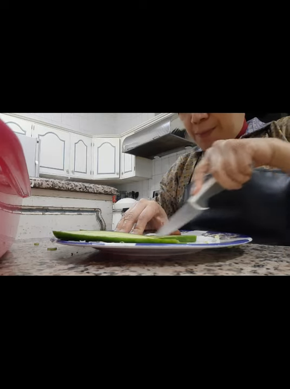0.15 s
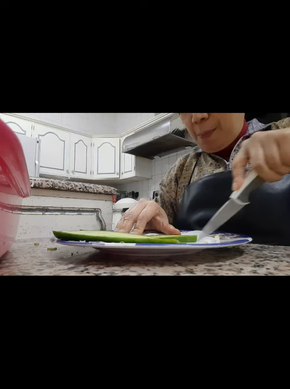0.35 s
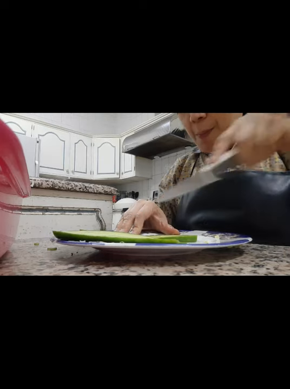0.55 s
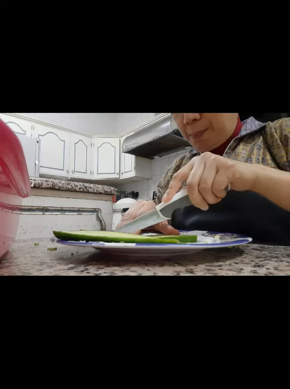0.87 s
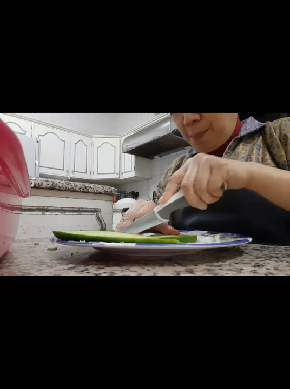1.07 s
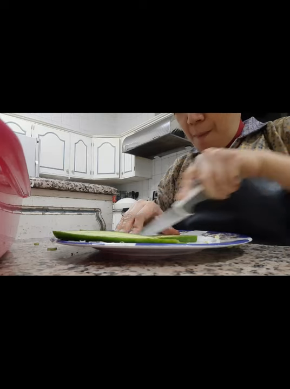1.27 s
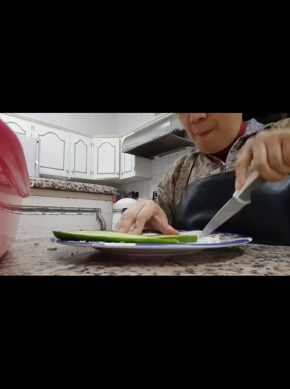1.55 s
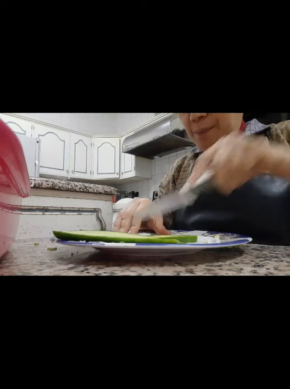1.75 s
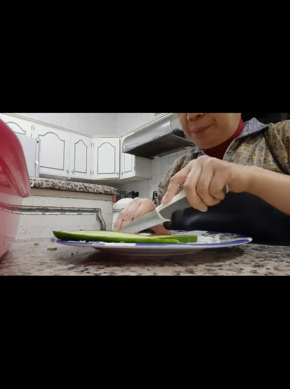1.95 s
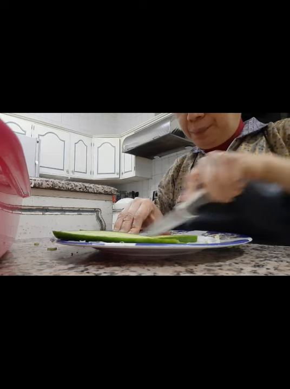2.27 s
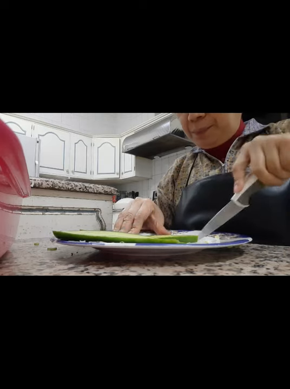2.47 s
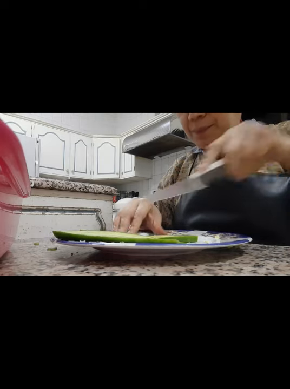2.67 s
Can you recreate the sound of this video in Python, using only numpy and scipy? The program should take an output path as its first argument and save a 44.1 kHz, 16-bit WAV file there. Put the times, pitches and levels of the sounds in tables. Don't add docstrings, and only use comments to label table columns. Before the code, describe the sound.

A knife slices a cucumber on a china plate, crunchy rasps ending in sharp clicks

```python
import sys
import numpy as np
from scipy import signal
from scipy.fft import rfft, irfft
from scipy.io import wavfile
from scipy.ndimage import uniform_filter1d

SR = 44100
rng = np.random.default_rng(int(sys.argv[2]) if len(sys.argv) > 2 else 0)


def file_out(sig):
    cols = np.atleast_2d(sig).T
    lim = np.clip(cols, -1, 1)
    pcm = np.round(lim * 32767).astype(np.int16)
    wavfile.write(sys.argv[1], SR, pcm)


def decibels_to_gain(level_db):
    exponent = np.asarray(level_db, float) / 20
    return 10 ** exponent


N = 123479


def table(rows, hz):
    r = np.array(rows)
    return np.interp(np.log(hz), np.log(r[:, 0]), r[:, 1])


def unit(x):
    return x / np.sqrt(np.mean(x ** 2))


def ring(x, modes):
    out = 0
    for k, (hz, db, t60_s) in enumerate(modes):
        pole = np.exp(2j * np.pi * hz / SR - np.log(1000) / (t60_s * SR))
        out = out + (-1) ** k * decibels_to_gain(db) * signal.lfilter([1], [1, -pole], x).imag
    return out


def walk(rate_hz):
    hold = int(SR / rate_hz)
    levels = np.repeat(rng.standard_normal(N // hold + 1), hold)
    return uniform_filter1d(levels, hold)[:N]


# [f/Hz, width/Hz, level/dB]
FRIDGE_BANDS = [(56, 22, -68.5), (238, 14, -53), (292, 14, -47), (317, 12, -48), (365, 20, -55),
                (410, 14, -56), (463, 8, -53), (2720, 140, -70)]
# [f/Hz, density/dB]
AIR_SPECTRUM = [(40, -32.5), (280, -10), (460, -12.5), (1320, -32.5), (2750, -46.5), (3100, -56),
                (9000, -56.5), (15000, -68)]
# [f/Hz, level/dB]
AIR_SIDE = [(30, 0), (130, -16), (300, -10), (2000, 6), (10000, -1.5)]
MOTOR_DB = [-62.5, -48.5, -47.5]
AIR_DB = -42.5
MOTOR_HZ, FAN_HZ, FAN_DB, MOTOR_WAVER_DB = 105.6, 291.8, -45.5, 2.5


def kitchen():
    hz = np.maximum(np.fft.rfftfreq(N, 1 / SR), 1)
    power = decibels_to_gain(table(AIR_SPECTRUM, hz)) ** 2
    power = power / power.sum() * decibels_to_gain(AIR_DB) ** 2
    for f_hz, width_hz, db in FRIDGE_BANDS:
        band = 1 / (1 + (2 * (hz - f_hz) / width_hz) ** 4)
        power = power + band / band.sum() * decibels_to_gain(db) ** 2
    side_gain = decibels_to_gain(table(AIR_SIDE, hz))
    shape = np.sqrt(power * len(hz)) * [np.ones(len(hz)), side_gain]
    mid, side = irfft(rfft(rng.standard_normal((2, N))) * shape, N)

    phase = 2 * np.pi * MOTOR_HZ * np.cumsum(1 + .004 * walk(3)) / SR
    for k, db in enumerate(MOTOR_DB):
        level = np.sqrt(2) * decibels_to_gain(db + MOTOR_WAVER_DB * walk(9))
        mid = mid + level * np.sin((k + 1) * phase)
    fan_level = np.sqrt(2) * decibels_to_gain(FAN_DB + MOTOR_WAVER_DB * walk(12))
    mid = mid + fan_level * np.sin(phase * FAN_HZ / MOTOR_HZ)
    return np.array([mid + side, mid - side]) * decibels_to_gain(0.26 * walk(1.26))


# [f/Hz, t60/s]
ROOM_T60 = [(300, 0.94), (2000, 0.81), (5000, 0.56), (14000, 0.31)]
PREDELAY_S = 0.0054


def echo(size=40000):
    t, out = np.arange(size) / SR, 0
    for hz in 250 * np.sqrt(2) ** np.arange(13):
        edges_hz = [hz / np.sqrt(2), min(hz * np.sqrt(2), .45 * SR)]
        sos = signal.butter(2, edges_hz, "band", fs=SR, output="sos")
        noise = signal.sosfilt(sos, rng.standard_normal((2, size)))
        out = out + noise * decibels_to_gain(-60 * t / table(ROOM_T60, hz))
    out = out * np.clip(t / PREDELAY_S, 0, 1)
    return out / np.sqrt(np.sum(out ** 2, axis=1, keepdims=True))


APART = [0.89, 0.12, 0.67, 0.97]


def ports(shared, left, right, group):
    apart = APART[group]
    return np.sqrt(1 - apart) * shared + np.sqrt(apart) * np.array([left, right])


KNOCK_SAMPLES, PORT_LAG_S = 8192, 4.6e-5


def knocks(rows, groups, contact_s, chatter_db):
    out, t = np.zeros((3, N + KNOCK_SAMPLES)), np.arange(KNOCK_SAMPLES) / SR
    lag = np.array([[0], [int(PORT_LAG_S * SR)]])
    for row in rows:
        i = int(row[0] * SR)
        for g, modes in enumerate(groups):
            strike_at = int(contact_s[g] * SR / 8) + lag
            strike = 1. * (np.arange(KNOCK_SAMPLES) == strike_at)
            rough = ports(*rng.standard_normal((3, KNOCK_SAMPLES)), g)
            chatter = decibels_to_gain(chatter_db) * rough * np.exp(-(t / contact_s[g]) ** 2)
            y, even = ring(strike + chatter, modes), ring(strike[0], modes)
            if g in (1, 2):
                y, even = ring(y, modes), ring(even, modes)
            even = unit(even) * np.sqrt(np.mean(y ** 2))
            gain = decibels_to_gain(row[1 + g]) / np.abs(y).max()
            out[:, i:i + KNOCK_SAMPLES] += np.vstack([y, even]) * gain
    return out[:, :N]


# [t/s, crack/dB, boom/dB, body/dB, ring/dB], peaks
LANDINGS = [
    (1.0615, -42, -55, -45, -66),
    (1.1065, -26, -27, -29.5, -32.5),
    (2.1242, -15.5, -26, -23, -21),
    (2.4484, -37, -50, -20, -60),
    (2.6267, -49, -26.5, -43, -44),
    (2.79, -61, -64, -58, -56),
]
# [f/Hz, level/dB, t60/s]
LANDING_MODES = [
    [(2800, -4, .004), (3900, -3, 0.003), (5600, -2, 0.002), (7300, -2, 0.0015), (9200, -1, 0.0015), (11500, -2, .0012), (14200, -3, .0012)],
    [(700, 0, 0.009), (900, -4, 0.008)],
    [(1800, 1.5, 0.007), (2130, -1, .007)],
    [(635, -2, 0.13), (2400, 0, 0.16)],
]
LANDING_CONTACT_S = [0.0051, 0.00067, 0.003, 0.0023]


def landings():
    return knocks(LANDINGS, LANDING_MODES, LANDING_CONTACT_S, chatter_db=-15)


# [t/s, crack/dB, boom/dB, body/dB, ring/dB], peaks
TIP_CLICKS = [
    (.4001, -13, -22, -23, -19),
    (.4535, -36, -45, -27, -45),
    (1.5246, -8, -25, -15, -17),
    (1.5334, -10, -28, -19, -18),
    (2.5184, -19.5, -26, -26, -24),
]
# [f/Hz, level/dB, t60/s]
TIP_MODES = [
    [(4510, 1.5, 0.0023), (5300, -2, 0.0045), (6210, 0.5, 0.0025), (8040, 2, 0.0015), (9400, -1.5, 0.0011), (12640, -1, 0.0013), (15100, -19, 0.0021)],
    [(590, -11, .012), (740, -10.5, 0.0091)],
    [(1678, 4, 0.0091), (2010, 2, 0.012), (2205, -5, 0.017)],
    [(2968, -4, 0.017), (2360, -10.5, 0.0033)],
]
TIP_CONTACT_S = [0.0028, 0.00056, 0.0011, 0.0027]


def tip_clicks():
    return knocks(TIP_CLICKS, TIP_MODES, TIP_CONTACT_S, chatter_db=-19)


# [t/s, crack/dB, boom/dB, body/dB, ring/dB], peaks
BREAK_THROUGH = [
    (.2909, -13, -8.5, -4.5, -21),
]
# [f/Hz, level/dB, t60/s]
BREAK_MODES = [
    [(4540, 2, 0.002), (6700, -3.5, 0.0037), (11800, 5, 0.00072)],
    [(631, 0, 0.016), (1044, -6.5, 0.0098)],
    [(1727, -1.5, 0.013), (2153, -1.5, 0.012)],
    [(2820, 0, 0.014)],
]
BREAK_CONTACT_S = [0.0037, 0.0022, 0.002, 0.0023]


def break_through():
    return knocks(BREAK_THROUGH, BREAK_MODES, BREAK_CONTACT_S, chatter_db=-19)


# [t/s, boom peak/dB, body peak/dB]
SNAPS = [(.0214, -36, -30), (.0613, -49, -32), (.111, -39, -41), (.134, -53, -40), (.177, -29, -36),
         (.205, -37, -27), (.256, -33, -25), (.3045, -43, -26), (.309, -32, -34), (.3195, -39, -27),
         (1.287, -32, -37), (1.328, -35, -41), (1.336, -35, -40), (1.3414, -34, -49), (1.353, -31, -32),
         (1.3605, -21, -28.5), (1.3745, -15.5, -38), (1.3945, -22, -29), (1.401, -21, -36),
         (1.4135, -20, -25), (1.426, -18, -37), (1.442, -21, -36), (2.2987, -40, -43), (2.321, -32, -41),
         (2.34, -35, -45), (2.371, -23.5, -27), (2.378, -18.5, -36), (2.39, -21, -32), (2.407, -24, -23),
         (2.421, -20.5, -27)]
# [f/Hz, level/dB, t60/s]
SNAP_MODES = [
    [(631.5, -1, 0.016), (918, -9.5, 0.022)],
    [(1756, 3.5, 0.011), (2078, -1.5, 0.019)],
]


def fibre_snaps():
    out, push = 0, np.pad(np.hanning(12), (0, 4096))
    for g, modes in enumerate(SNAP_MODES):
        snap, kicks = ring(ring(push, modes), modes), np.zeros(N)
        for row in SNAPS:
            kicks[int(row[0] * SR)] = decibels_to_gain(row[1 + g])
        out = out + signal.fftconvolve(kicks, snap / np.abs(snap).max())[:N]
    return out


TEARS_PER_S = [6000, 600, 1200]
TEAR_SPREAD_DB = [2.5, 3.5, 3.5]
TEAR_LIMIT = 3.5


def tears(g):
    when, sign, draw = rng.random((3, 3, N))
    spreads = np.minimum(-np.log(draw + 1e-9), TEAR_LIMIT)
    size = decibels_to_gain(spreads * TEAR_SPREAD_DB[g])
    breaks = (when < TEARS_PER_S[g] / SR) * np.sign(sign - .5) * size
    return ports(*breaks, g)


# [t/s, rasp level/dB, deep-flesh crunch/dB, edge hiss/dB], last two re rasp
STROKES = [
    [(0, -44, 1, -6), (.07, -45, 5.5, -3), (.15, -39, 1.5, -9), (.25, -36, 2, -7), (.31, -33, 4, -8.5),
     (.35, -48, -22, 0.5), (.39, -55, 1, -14), (.44, -41.5, -10, -4.5), (.5, -47, -11, -23)],
    [(2.095, -71, 2, 2), (2.125, -56, 5, 7)],
    [(1.072, -61.5, 1, 6), (1.1, -56, 11, -7), (1.12, -50, 8, -21), (1.2, -62.5, 0, -1.5),
     (1.3, -38.5, 0.5, -11), (1.39, -39.5, 8.5, -4), (1.45, -31, -2.5, -11.5), (1.49, -48.5, 2, 0),
     (1.52, -46, -4, -14)],
    [(2.135, -45.5, 9, -14), (2.21, -59, 7, -6), (2.242, -51.5, 1, 3), (2.265, -50, 4, -5),
     (2.31, -40, -3.5, -8.5), (2.38, -39, 8.5, -5.5), (2.44, -37.5, -4.5, -9.5), (2.48, -43.5, -7, -6.5),
     (2.515, -54, 1, -6)],
]
# [f/Hz, level/dB, t60/s]
BOOM = [(598, 10, 0.018), (665.5, 10.5, 0.021), (728, 7, 0.03), (974, -5, 0.044), (1163, -15, 0.053)]
# [f/Hz, level/dB, t60/s]
BODY = [(1467, -3, 0.015), (1742, 5.5, 0.014), (1950, 4.5, 0.018), (2163, 6, 0.014), (2420, 0, 0.016)]
# [f/Hz, level/dB, t60/s]
RING = [(2550, -12, 0.0056), (2764, 11, 0.0052)]
# [f/Hz, level/dB, t60/s]
CRACK = [(3500, -6, 0.00037), (4540, 4.5, 0.00084), (6550, -2, 0.002), (7780, -1.5, 0.0012),
         (11440, -10, 0.0036), (13800, -6.5, 0.0013)]
RASP_RING_DB, SLIP_DB, SLIPS_PER_S, STROKE_FADE_S = -16.5, 2.5, 70, .01


def rasp():
    t, out = np.arange(N) / SR, 0
    hiss = unit(ring(tears(0), CRACK))
    crunch = unit(ring(tears(1), BOOM))
    body_tears = tears(2)
    body = unit(ring(body_tears, BODY)) + decibels_to_gain(RASP_RING_DB) * unit(ring(body_tears, RING))
    slip_db = SLIP_DB * walk(SLIPS_PER_S)
    for rows in STROKES:
        at_s, rasp_db, crunch_db, hiss_db = np.array(rows).T
        inside_s = np.minimum(t - at_s[0] + STROKE_FADE_S, at_s[-1] - t)
        on = np.clip(inside_s / STROKE_FADE_S, 0, 1)
        level = on * decibels_to_gain(np.interp(t, at_s, rasp_db) + slip_db)
        crunch_gain = decibels_to_gain(np.interp(t, at_s, crunch_db))
        hiss_gain = decibels_to_gain(np.interp(t, at_s, hiss_db))
        out = out + level * (body + crunch_gain * crunch + hiss_gain * hiss)
    return out


PLATE_LOW_HZ = 343


def plate_highpass(x):
    return signal.sosfilt(signal.butter(2, PLATE_LOW_HZ, "high", fs=SR, output="sos"), x)


LEFT_DB, KNIFE_LEFT_DB, ROOM_DB = 0.73, 1.85, -11


def balance(left_db):
    return decibels_to_gain(np.array([[left_db], [-left_db]]))


def scene():
    hits = landings() + tip_clicks() + break_through()
    cut = rasp() + fibre_snaps()
    room = signal.fftconvolve(plate_highpass(cut + hits[2]), echo(), axes=1)[:, :N]
    heard = plate_highpass(cut + hits[:2]) * balance(KNIFE_LEFT_DB)
    return (heard + decibels_to_gain(ROOM_DB) * room + kitchen()) * balance(LEFT_DB)


def band_limit(x):
    return signal.sosfilt(signal.butter(12, 16660, fs=SR, output="sos"), x)


MIC_TOP_HZ = 15300


def record(dry):
    mix = signal.sosfilt(signal.cheby1(10, 1, MIC_TOP_HZ, fs=SR, output="sos"), dry)
    return band_limit(mix)


dry = scene()
out = record(dry)
file_out(out)
```